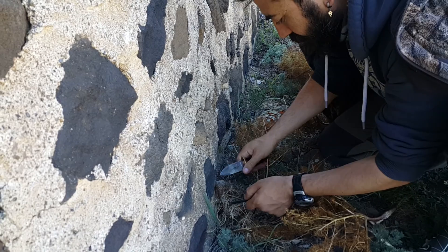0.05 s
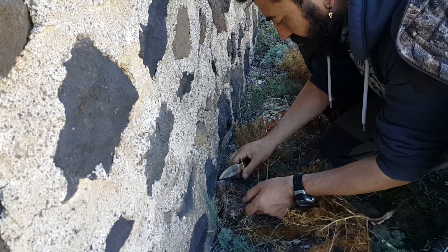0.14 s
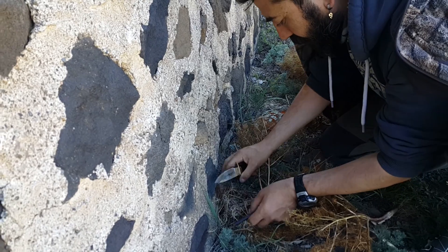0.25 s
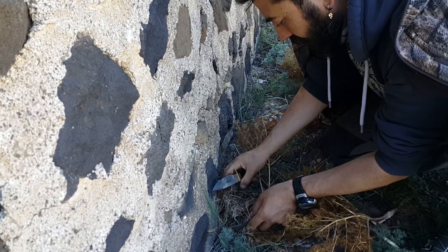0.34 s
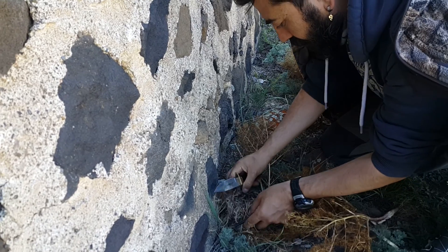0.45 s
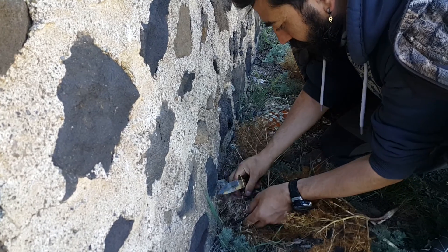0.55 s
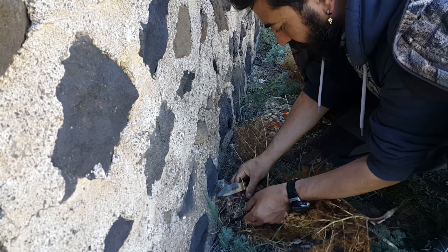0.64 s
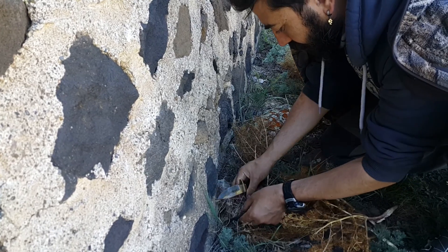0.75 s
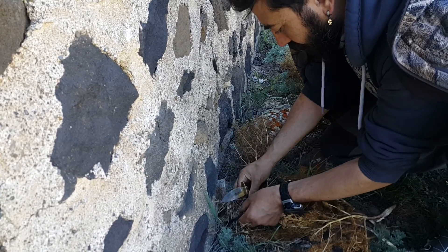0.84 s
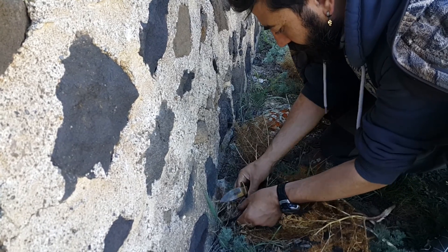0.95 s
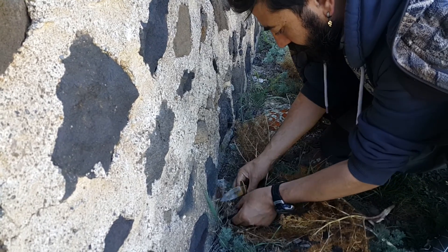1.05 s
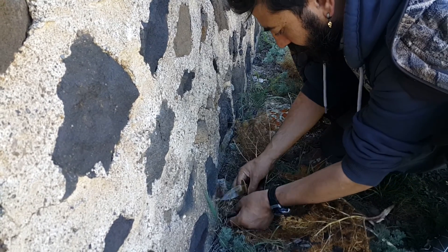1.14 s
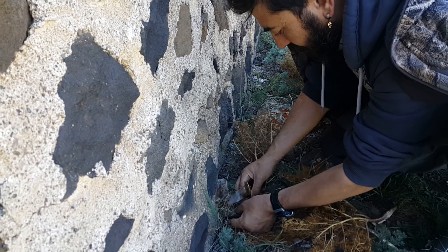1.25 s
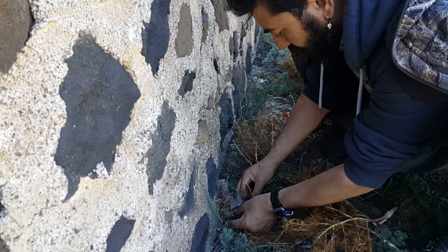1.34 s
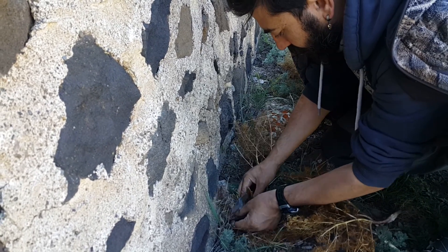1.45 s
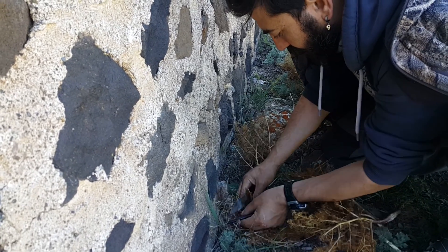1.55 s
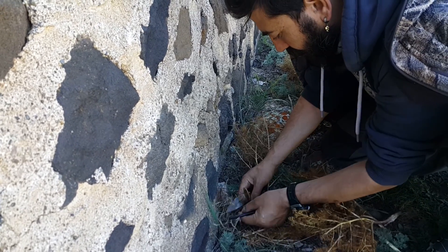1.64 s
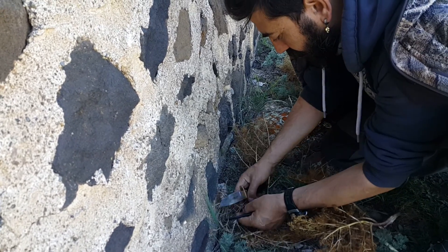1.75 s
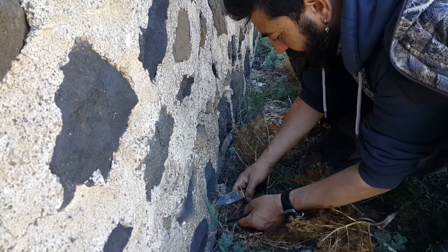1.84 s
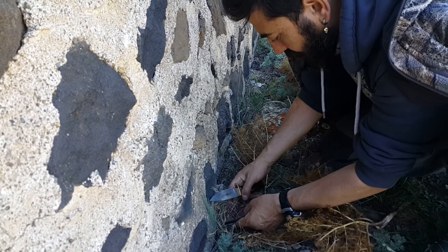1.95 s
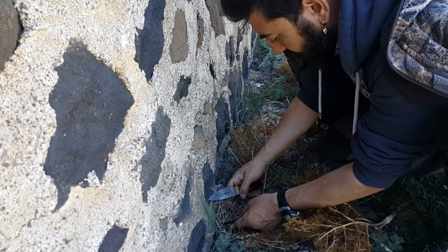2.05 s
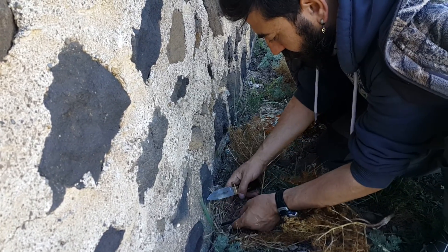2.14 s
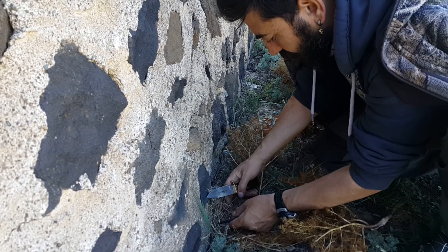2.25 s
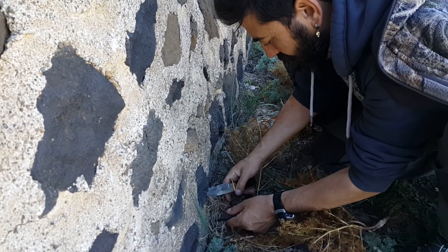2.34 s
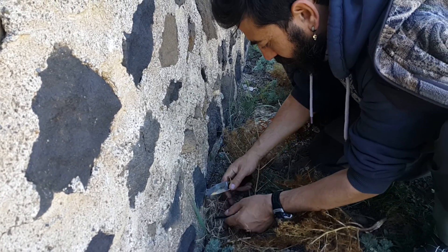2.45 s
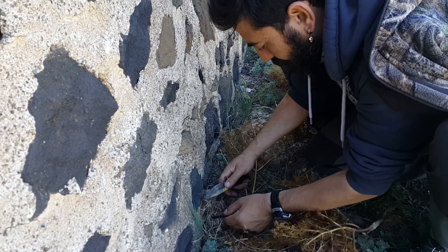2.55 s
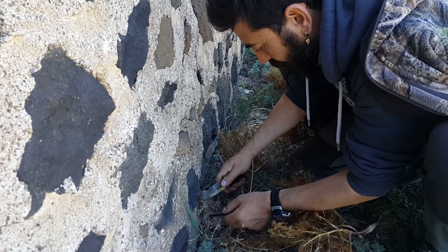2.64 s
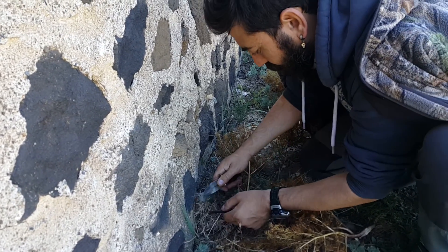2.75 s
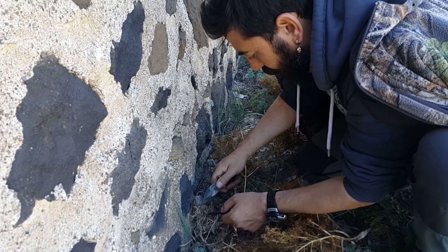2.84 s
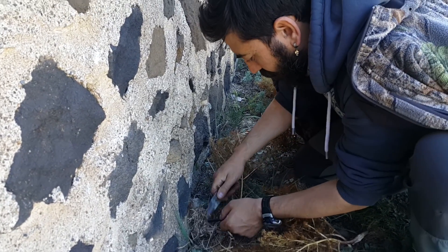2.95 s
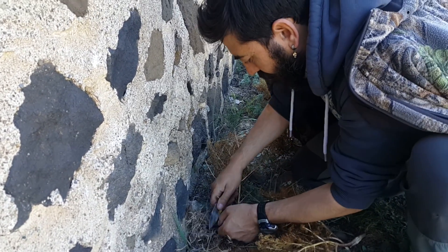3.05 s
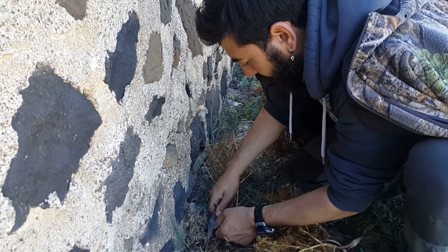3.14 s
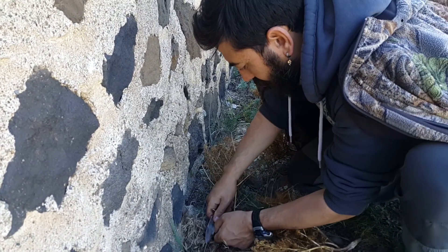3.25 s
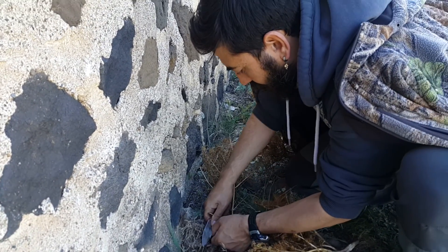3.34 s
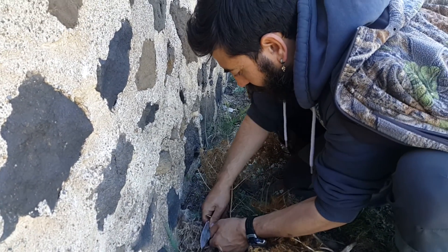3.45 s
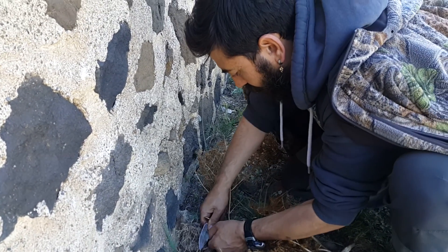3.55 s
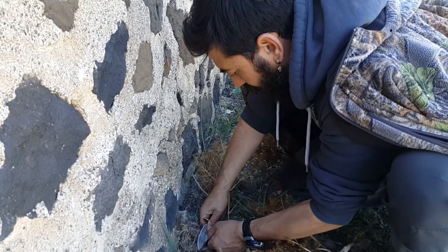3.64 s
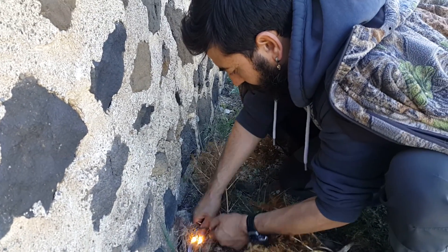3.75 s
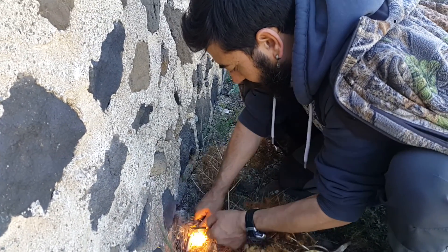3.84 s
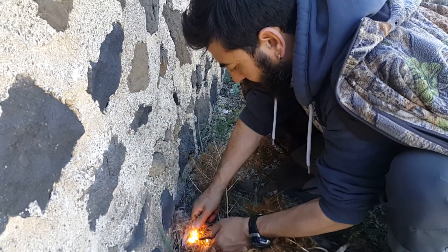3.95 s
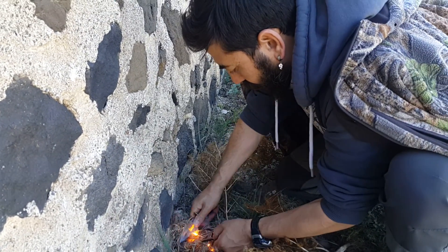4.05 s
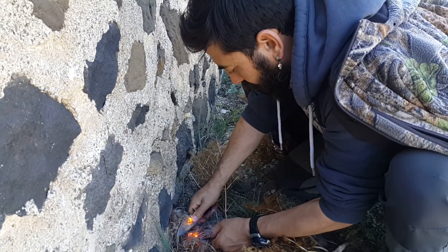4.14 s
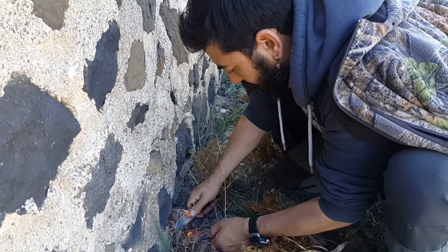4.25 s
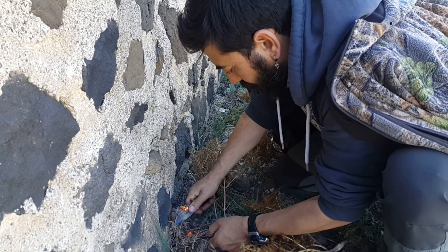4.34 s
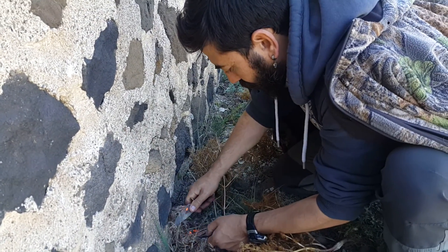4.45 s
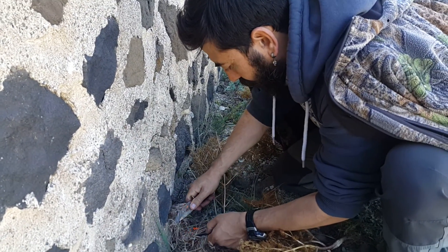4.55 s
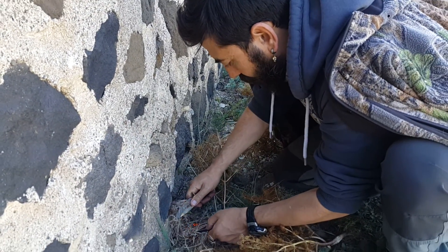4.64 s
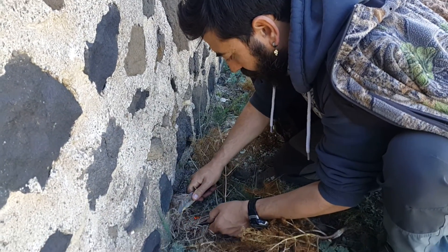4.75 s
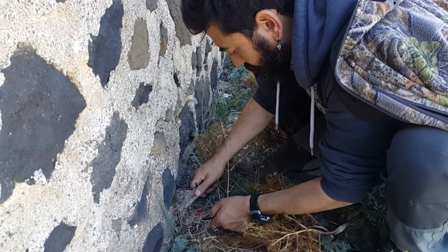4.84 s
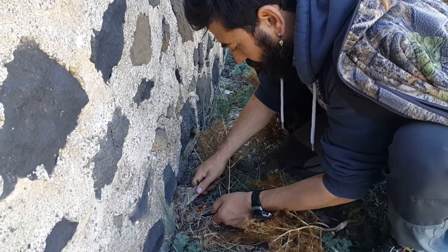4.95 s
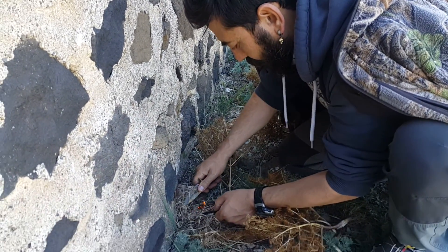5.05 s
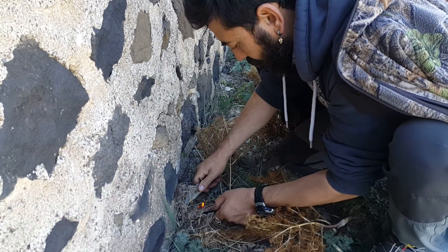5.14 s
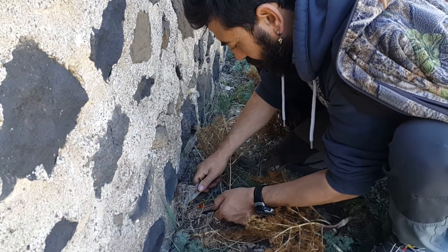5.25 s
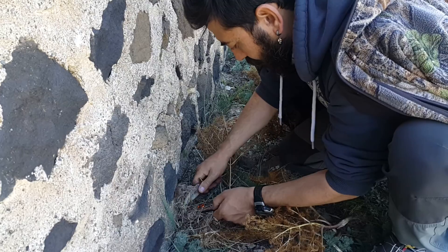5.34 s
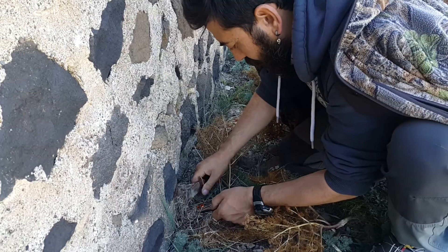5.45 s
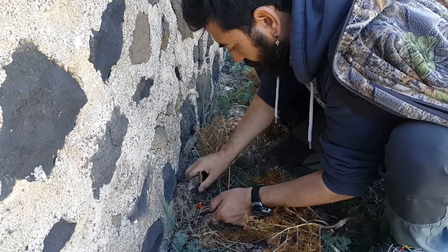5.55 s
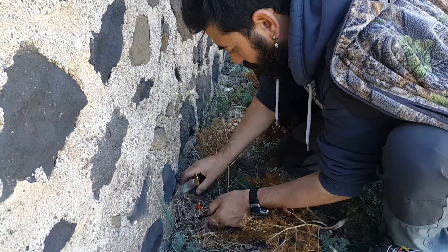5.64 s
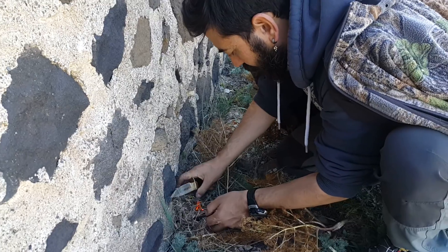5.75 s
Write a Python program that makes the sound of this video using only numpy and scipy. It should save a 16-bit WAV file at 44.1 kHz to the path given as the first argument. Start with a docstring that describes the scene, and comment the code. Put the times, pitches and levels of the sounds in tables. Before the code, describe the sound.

A quiet outdoor place, heard close up on a stereo phone microphone, with faint steady distant air and low breeze buffeting mostly on the left. From 0 to 1 s dry grass rustles lightly with tiny ticks. Between about 1.2 and 1.8 s the rustling grows, with crisp stem snaps and a soft ground bump. At 2.1 s a knife blade strikes a metal fire rod: a hard, bright clink that chatters for some 50 ms and rings only briefly. Light rustling continues, with a dull bump near 2.9 s and a short, woody-metallic handle tap at 3.27 s. Around 3.83 to 3.9 s the blade drags quickly down the rod in a high, singing rasp, bursting straight into snapping sparks, bright grit and duller crunching until about 4.2 s, fading by 4.4 s. Afterwards come sparse faint ticks, a low bump near 4.8 s, and a little grass movement toward the end.

```python
"""Outdoors over dry grass, close to a phone: a knife strikes, taps and then scrapes a metal fire rod.
Far air is shaped noise; a breeze of low lumpy noise buffets the left port in gusts.
Grass rustles as crackling noise, stems snap as ticks with noisy tails, and dull bumps are noise knocks.
Noisy contacts ring the rod and handle; the scrape sings in bands and sparks spray as grit and crunch."""
import sys
import numpy as np
from scipy import signal
from scipy.fft import rfft, irfft, next_fast_len
from scipy.io import wavfile
from scipy.ndimage import uniform_filter1d

SR = 44100
rng = np.random.default_rng(int(sys.argv[2]) if len(sys.argv) > 2 else 0)


def pcm_store(signal):
    """Save signal as 16-bit PCM."""
    levels = np.round(np.clip(np.atleast_2d(signal), -1, 1) * 32767)
    wavfile.write(sys.argv[1], SR, levels.astype(np.int16).T)


N = 254898


def amp(db):
    """Decibels to amplitude."""
    return 10 ** (np.asarray(db) / 20)


def evened(x):
    """Scales x to an rms of 1."""
    return x / np.sqrt(np.mean(x ** 2) + 1e-20)


def read(points, hz):
    """Reads a frequency curve, interpolating along log frequency."""
    f, value = np.transpose(points)
    return np.interp(np.log(hz + 1), np.log(f + 1), value)


def column(rows, order):
    """One column of a time curve, sample by sample."""
    return np.interp(np.arange(N) / SR, np.transpose(rows)[0], np.transpose(rows)[order])


def within(rows):
    """1 while a time curve lasts, with 5 ms fades."""
    t = np.arange(N) / SR
    return np.clip(np.minimum(t - rows[0][0], rows[-1][0] - t) * 200, 0, 1)


def add(mix, s, sound):
    """Adds a sound into the mix from s seconds on."""
    part = mix[round(s * SR):][:len(sound)]
    part += sound[:len(part)]


def colour(x, db_of):
    """Filters x by the gain db_of(Hz)."""
    size = next_fast_len(len(x) + 4096)
    gain = amp(db_of(np.fft.rfftfreq(size, 1 / SR)))
    return irfft(rfft(x, size) * gain, size)[:len(x)]


def octaves(hz, centre_hz=4000):
    """Distance from a centre frequency in octaves."""
    return np.log2((hz + 1) / centre_hz)


def resonate(x, hz, t60):
    """A mode that may glide: shift down, let it decay, shift back."""
    turn = np.exp(2j * np.pi * np.cumsum(hz * np.ones(len(x))) / SR)
    r = 1000 ** (-1 / (t60 * SR))
    return (turn * signal.lfilter([1], [1, -r], x / turn + 1e-18)).real


def crackle(per_s, spread_db, t60):
    """Noise in short dying puffs of uneven size over a very faint floor."""
    starts = rng.random(N) < per_s / SR
    size = amp(spread_db * np.minimum(rng.exponential(1, N), 5)) * starts
    puffs = signal.lfilter([1], [1, -1000 ** (-2 / (t60 * SR))], size ** 2)  # power
    return evened(rng.standard_normal(N) * np.sqrt(puffs + 1e-9))


def waver(per_s):
    """Slow random drift, rms 1, from noise averaged twice over 1 / per_s seconds."""
    size = round(SR / per_s)
    return evened(uniform_filter1d(uniform_filter1d(rng.standard_normal(N), size), size))


# spectrum of the far air: (frequency [Hz], density [dB per Hz])
AIR_COLOUR = [(12, 10.5), (20, 0), (43, -2), (96, -4), (332, -13.5), (452, -11.5), (1690, -21.5),
              (3330, -24), (6170, -28), (8650, -32.5), (11500, -31.5), (15200, -28.5), (16500, -66)]
# likeness of the two ports: (frequency [Hz], correlation [-1 to 1])
AIR_LIKENESS = [(60, 0.94), (240, 0.993), (950, 0.033), (3770, -0.285), (15000, 0.44)]
# balance of the two ports: (frequency [Hz], left minus right [dB])
AIR_BALANCE = [(60, -3), (240, 1), (950, 2), (3770, -3.5), (15000, 6)]
AIR_DB = -59.5


def air():
    """Far traffic and leaves as steady shaped noise, nearly alike in both ports in the bass."""
    frames, hz = N // 256 + 5, np.fft.rfftfreq(1024, 1 / SR)
    a, b, c, d = rng.standard_normal((frames, 513, 4)).T
    same = np.clip(read(AIR_LIKENESS, hz), -1, 1)[:, None]
    lean = amp(read(AIR_BALANCE, hz)[:, None] / 2)
    left = a + 1j * b
    right = same * left + np.sqrt(1 - same ** 2) * (c + 1j * d)
    z = np.array([left * lean, right / lean]) * amp(read(AIR_COLOUR, hz)[:, None])
    return amp(AIR_DB) * evened(signal.istft(z, nperseg=1024, noverlap=768)[1][:, :N])


# spectrum of the buffeting: (frequency [Hz], density [dB per Hz])
BREEZE_COLOUR = [(12, -39.5), (20, -43.5), (53, 3), (118, 0.5), (245, -10.5), (377, -40.5), (403, -21),
                 (500, -31), (650, -70.5), (1100, -120)]
# gusts: (peak time [s], level before the port gains [dB], time to die by 20 dB [s])
GUSTS = [(0.33, -60.5, 0.13), (1.02, -61.5, 0.09), (1.36, -60.5, 0.31), (1.52, -61, 0.18),
         (2.074, -38, 0.0448), (2.17, -50, 0.0847), (3.1, -63, 0.03), (3.29, -54.5, 0.0237),
         (3.65, -56.5, 0.17), (3.755, -43, .03), (3.855, -45, .05), (4.05, -56.5, 0.3228),
         (4.82, -60, 0.13)]
LULL_DB, LULL_WAVER_DB = -67, 2.5
GUST_RISE = 2.36  # a gust builds this many times more slowly than it dies


def breeze():
    """Lumpy low buffeting, nearly all on the left port, with gusts on a wavering lull."""
    eddies = evened(colour(crackle(150, 2.0, 0.0404), lambda hz: read(BREEZE_COLOUR, hz)))
    t = np.arange(N) / SR
    power = amp(LULL_DB + LULL_WAVER_DB * waver(6.4)) ** 2
    for s, db, fall_s in GUSTS:
        away_s = np.maximum(t - s, (s - t) / GUST_RISE)
        power = power + amp(db - 20 * away_s / fall_s) ** 2
    return eddies * np.sqrt(power) * amp([[4.], [-18.]])  # left, right


# hands and sleeves moving through dry grass: (time [s], level [dB])
RUSTLE = [(0.0, -71), (0.3, -67.5), (0.53, -61), (1.04, -62.5), (1.22, -58.5), (1.33, -54.5), (1.39, -65),
          (1.49, -62), (1.62, -54.5), (1.72, -54), (1.79, -61), (2.15, -59.5), (2.24, -68.5), (2.4, -65.5),
          (2.75, -66.5), (3.04, -71.5), (3.3, -65.5), (3.52, -61.5), (3.75, -62), (4.3, -72.5), (4.5, -69),
          (4.62, -76), (5.2, -74.5), (5.5, -78), (5.78, -66.5)]
# basic colour of the near sounds: (frequency [Hz], density [dB per Hz])
NEAR_COLOUR = [(180, -21), (300, -10.5), (420, -10.5), (549, -19.5), (649, -8), (754, -12), (1150, -11),
               (2650, -8.5), (3470, -1), (4310, -6.5), (6450, -4), (8580, -15), (10900, -2.5),
               (15400, -14.5), (16500, -31)]
# pitches of the ticking blades of grass, thick to thin: (frequency [Hz])
TICK_HZ = (3500, 6000, 11000)
RUSTLE_WAVER_DB, TICKS_PER_S, TICKS_DB = 1.1041, 45, -10.5


def rustle():
    """Dry grass brushes in hundreds of grains a second; some blades tick on their own pitch."""
    grains = crackle(895, 0.73, 0.0274) * amp(RUSTLE_WAVER_DB * waver(16.0))
    for hz in TICK_HZ:
        ticks = resonate(crackle(TICKS_PER_S / 3, 3.06, .014), hz, 5. / hz)
        grains = grains + amp(TICKS_DB) * evened(ticks) * np.sqrt(hz / SR)
    return evened(colour(grains, lambda hz: read(NEAR_COLOUR, hz))) * amp(column(RUSTLE, order=1))


# stems snapping and sparks popping:
# (time [s], relative level [dB], ring [Hz], ring boost [dB], tilt [dB per octave])
SNAPS = [(0.1175, -43.5, 10900, 6, 3), (0.334, -41, 12500, 5, 9), (0.3665, -39.5, 4800, 10, 2.5),
         (0.7646, -35.5, 3530, 15.5, 4), (0.7988, -34, 3380, 14, 4), (0.858, -35, 10560, 9.5, 10),
         (0.9421, -37, 5540, 8, 4.5), (1.1967, -40, 4390, 8, 2), (1.233, -20.5, 1500, 9, -4.5),
         (1.2803, -17, 3570, 5, 1.5), (1.3183, -33.5, 10700, 6.5, 9), (1.3306, -29.5, 3750, 9.5, 8.5),
         (1.4496, -21.5, 4640, 0, 3), (1.5812, -32.5, 5410, 9, 2.5), (1.6625, -26, 6700, 4.5, 2.5),
         (1.7214, -30, 3250, 9, 6), (1.9719, -42, 5950, 10.5, 0.95), (2.394, -35.5, 10260, 10, 7.5),
         (2.6478, -40, 3800, 5.5, 3.5), (2.6883, -42.5, 6760, 13, 2.5), (2.76, -36.5, 10400, 4, 9),
         (3.8172, -31, 10900, 9.5, -3.5), (3.8826, -13.5, 2654, 20, -3), (3.9063, -19.5, 6280, 5, -0.9),
         (3.928, -19.5, 6010, 1, 11), (3.9515, -18.5, 6140, 4.5, 3), (4.0004, -21, 4260, 12.5, 5.5),
         (4.0167, -23.5, 3400, 7.5, 1.5), (4.0775, -21.5, 2040, 8.5, -6.5), (4.089, -24.5, 3680, 18.5, -8),
         (4.1392, -17, 10660, 4.5, 4), (4.177, -35.5, 3460, 4, 12), (4.2244, -29.5, 3610, 7, 0.58),
         (4.2558, -38, 6160, 8.5, -1.4), (4.2654, -38, 1873, 14.5, -9), (4.342, -39, 5610, 11, -4.5),
         (4.5187, -40, 1600, 13, -6), (4.561, -39.5, 3660, 4, 0.6), (4.6879, -33.5, 3600, 2.5, -4),
         (4.809, -43, 1300, 6, -8), (5.161, -39, 3660, 8, 0.07), (5.5004, -35, 4400, 10.5, 3),
         (5.603, -39.5, 3640, 4.5, -0.37), (5.6354, -46.5, 6100, 15, -2), (5.688, -37.5, 2840, 7.5, -3.5)]
SNAP_T60_S = 0.01718


def snaps():
    """Each snap is one sharp tick and a short noisy tail, with its own ring and tilt."""
    out, t = np.zeros(N), np.arange(-128, 1920) / SR
    draws = rng.standard_normal((len(SNAPS), 2048))
    for (s, db, ring_hz, ring_db, tilt_db), noise in zip(SNAPS, draws):
        def snap_db(hz):
            bow = tilt_db * octaves(hz) - 0.705 * octaves(hz) ** 2
            low_cut = -10 * np.log10(1 + (450 / (hz + 1)) ** 4)
            ring = ring_db * np.exp(-(octaves(hz, ring_hz) / 0.226) ** 2)
            return read(NEAR_COLOUR, hz) + bow + low_cut + ring

        burst = 4.24 * (t == 0) + noise * (t > 0) * amp(-60 * abs(t) / SNAP_T60_S)
        tone = colour(burst, snap_db) * np.clip(1 + t / 0.000685, 0, 1)  # short fade-in
        add(out, s + t[0], amp(db - 2.5) * tone / abs(tone).max())
    return out


# fingers and handle bumping the ground: (time [s], relative level [dB], centre [Hz], t60 [s])
BUMPS = [(1.297, -44, 650, 0.039), (1.372, -43, 221, 0.04), (2.867, -47.5, 223, 0.0425),
         (4.05, -34.5, 385, 0.046), (4.804, -40.5, 242, 0.042)]


def bumps():
    """Soft knocks without a ring: dying noise in a broad band."""
    out, t = np.zeros(N), np.arange(4096) / SR
    for (s, db, hz, t60), noise in zip(BUMPS, rng.standard_normal((len(BUMPS), 4096))):
        knock = colour(noise, lambda f: -3.5 * octaves(f, hz) ** 2)
        knock = knock * np.minimum(t / 0.00693, 1) * amp(-60 * t / t60)
        add(out, s, amp(db - 5.5) * knock / abs(knock).max())
    return out


# hot sparks and the blade crunching into the tinder: (time [s], relative level [dB])
SPRAY = [(3.877, -37), (3.937, -38.5), (3.951, -31.5), (3.971, -38.5), (4.0, -35), (4.094, -38.5),
         (4.13, -46), (4.24, -56), (4.35, -66.5), (4.4, -75)]
# colour of grit and crunch: (frequency [Hz], density [dB per Hz])
SPRAY_COLOUR = [(88, -32), (150, -0.5), (245, -14.5), (378, -6.5), (518, -7.5), (1560, -6.5), (2400, -7.5),
                (2700, -17.5), (3290, -3.5), (4690, -5), (6170, -4), (7510, -15.5), (12500, -7),
                (15600, -25), (16500, -27)]
# modes of the free blade: (frequency [Hz], relative level [dB])
BLADE = [(3650, -17), (4300, -18.5), (5150, -11), (6120, -8)]
SPLIT_HZ = 2500  # grit lies above, crunch below
CRUNCH_DB, CRUNCH_SLOPE = -8.5, -0.203  # the crunch fades more slowly than the grit


def spray():
    """Bright fine grit rings the blade in shifting patches, over a coarser dull crunch."""
    def above(hz):
        return -10 * np.log10(1 + (SPLIT_HZ / (hz + 1)) ** 6)

    def below(hz):
        return above(SPLIT_HZ ** 2 / (hz + 1))

    grit = crackle(1100, 1.96, 0.0126) + amp(-7) * crackle(220, 2.5, .003)
    grit = evened(colour(grit, lambda hz: read(SPRAY_COLOUR, hz) + above(hz)))
    grip_db = column(SPRAY, order=1) + 38  # the blade rings less once it rests in the tinder
    for hz, db in BLADE:
        patch = evened(uniform_filter1d(rng.standard_normal(N), size=900))
        ring = evened(resonate(grit, hz, .011))
        grit = grit + amp(db + 4. * patch + .35 * grip_db) * ring
    crunch = colour(crackle(430, 2.9, 0.0303), lambda hz: read(SPRAY_COLOUR, hz) + below(hz))
    crunch = evened(crunch) * amp(CRUNCH_DB + CRUNCH_SLOPE * grip_db)
    return (amp(-2.5) * grit + crunch) * amp(column(SPRAY, order=1)) * within(SPRAY)


def strike(contact, modes, hard_db, damping):
    """A contact force rings a set of modes, tinted by half the near colour."""
    ring = sum(amp(db + hard_db * octaves(hz)) * resonate(contact, hz, damping * t60)
               for hz, db, t60 in modes)
    return colour(ring, lambda hz: .5 * read(NEAR_COLOUR, hz))


# knife handle tapping the rod's grip: (time [s], relative level [dB], hardness [dB per octave])
TAPS = [(2.2723, -56, -15), (3.2674, -27, -3.5)]
# handle modes: (frequency [Hz], relative level [dB], t60 before damping [s])
HANDLE = [(1638, -14, 0.0185), (2710, -6, 0.0177), (3126, -4, 0.0172), (3910, -16, 0.029),
          (5307, -1, 0.0114), (9300, -24, 0.014)]


def taps():
    """A dull contact of 4 ms rings the handle."""
    out, t = np.zeros(N), np.arange(3000) / SR
    for (s, db, hard_db), draw in zip(TAPS, rng.standard_normal((len(TAPS), 3000))):
        push = np.sin(np.pi * np.minimum(t / 0.004, 1) ** 0.584)
        hit = strike(uniform_filter1d(draw, size=3) * push, HANDLE, hard_db, damping=0.854)
        add(out, s, amp(db) * hit / abs(hit).max())
    return out


# blade striking the rod:
# (time [s], relative level [dB], end of chatter [ms], hardness [dB per octave])
BLOWS = [(2.1097, -10, 11.55, 0.5), (2.124, -29, 1.8, 6), (2.1365, -20, 8.8, 4), (2.146, -20, 11.93, -4.5),
         (2.1582, -25.5, 5.87, -7)]
# blade and rod together: (frequency [Hz], relative level [dB], t60 before damping [s])
ROD = [(1777, -9.5, 0.042), (2850, -8, 0.072), (4172.5, 2, 0.052), (4570, 3, 0.03694), (5400, -17, 0.0425),
       (5860, -13.5, 0.023), (7310, -34.5, 0.036), (8008, -10.5, 0.0468), (10000, -33.5, 0.06),
       (10550, -22.5, 0.051), (10970, -10, 0.062), (11760, -5.5, 0.088), (12080, -3, 0.041),
       (14010, -29.5, 0.11)]


def blows():
    """The edge hits and skids for some milliseconds; the gripped rod rings briefly."""
    out, t = np.zeros(N), np.arange(4000) / SR
    for (s, db, chatter_ms, hard_db), draw in zip(BLOWS, rng.standard_normal((len(BLOWS), 4000))):
        skid = 1.3 * np.clip((chatter_ms - 1000 * t) / 5.94, 0, 1)
        contact = draw * abs(draw) * (skid + np.exp(-t / 0.00036))
        crack = colour(contact, lambda hz: -5. * octaves(hz, 2310) ** 2)
        hit = evened(strike(contact, ROD, hard_db, damping=0.388)) + amp(-11.5) * evened(crack)
        add(out, s, amp(db - 12.5) * hit / np.std(hit[:300]))
    return out


# the blade dragged down the rod:
# (time [s], relative level [dB], pitch factor on the bands [ratio], hardness [dB per octave])
STROKE = [(3.826, -56.5, 1.17, -4.5), (3.833, -44.5, 1.008, 4), (3.86, -40.5, 1.024, 0.48),
          (3.878, -41.5, 1.05, 1.5), (3.9, -49.5, 1.043, 5.5)]
# bands that sing under the pressed edge:
# (frequency before the pitch factor [Hz], width above the common 370 Hz [Hz], relative level [dB])
RASP = [(1915, 43, -2.5), (3600, 43, -1), (4500, 46, -11), (6200, 110, -7.5), (7230, 31, -8.5),
        (7860, 40, -6), (10454, 24, 0.5), (10990, 39, 1.5), (11440, 40, -1), (13920, 150, -14.5)]


def stroke():
    """Dense slips of the edge sing in broad bands that glide together, with a hiss."""
    slips = crackle(3900, 1.1, 0.00604)
    pitch, hard_db = column(STROKE, order=2), column(STROKE, order=3)
    ring = 0
    for hz, width_hz, db in RASP:
        t60 = np.log(1000) / np.pi / (370.0 + width_hz)
        twice = resonate(resonate(slips, hz * pitch, t60), hz * pitch, t60)  # steep skirts
        ring = ring + amp(db + hard_db * octaves(hz)) * evened(twice)
    hiss = evened(colour(slips, lambda hz: read(NEAR_COLOUR, hz)))
    scrape = amp(-4.5) * ring + amp(-2.0) * hiss
    return scrape * amp(column(STROKE, order=1)) * within(STROKE)


# the phone body shades the left port: (frequency [Hz], left minus right [dB])
SHADOW = [(60, 3.5), (150, 2.0), (380, 0.5), (950, -2.0), (2380, -9.0), (5980, -12.0), (15000, -11.0)]
LEAD_S = 5e-5  # near sounds reach the left port this much earlier


def ports(near):
    """The right port hears near sounds directly; the shaded left hears them early, treble scattered."""
    t, turn = np.arange(900) / SR, 2 * np.pi * 11 * np.arange(N) / SR
    paths = rng.standard_normal((2, 900)) * amp(-60 * t / 0.04)
    paths = paths / np.linalg.norm(paths[0])
    # two random echo paths trade places at 11 Hz
    moving = signal.oaconvolve(near * [np.sin(turn), np.cos(turn)], paths, axes=1)
    size = next_fast_len(N)
    hz = np.fft.rfftfreq(size, 1 / SR)
    share = 0.9 / (1 + (1800 / (hz + 1)) ** 2)  # energy share of the scatter
    right, shade = rfft(near, size), amp(read(SHADOW, hz))
    early = right * np.exp(2j * np.pi * hz * LEAD_S)
    left = np.sqrt(1 - share) * early + np.sqrt(share) * rfft(moving.sum(0)[:N], size)
    balance = 2 / np.sqrt(1 + shade ** 2)  # evens the summed power across frequency
    return irfft(np.array([shade * left, right]) * balance, size)[:, :N]


def scene():
    """Near sounds through the two ports, over the breeze and the far air."""
    near = rustle() + snaps() + bumps() + blows() + taps() + stroke() + spray()
    return ports(near) + breeze() + air()


def record(dry):
    """The microphone drops the deepest bass; then a band limit cuts the top treble."""
    thin = signal.sosfilt(signal.butter(3, 38, "high", fs=SR, output="sos"), dry)
    band_limit = signal.firwin(511, 16000, window=("kaiser", 9), fs=SR)
    return signal.oaconvolve(thin, band_limit[None], "same")


dry = scene()
out = record(dry)
pcm_store(out)
```